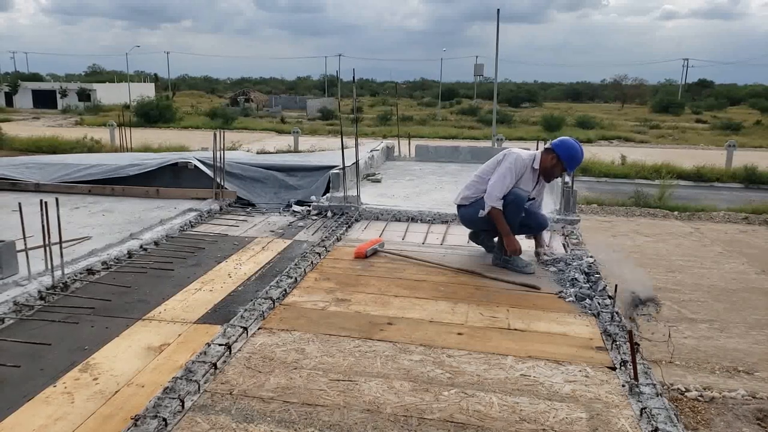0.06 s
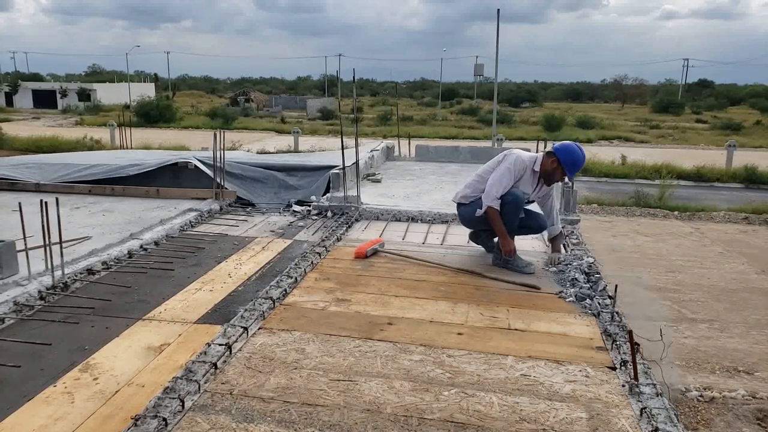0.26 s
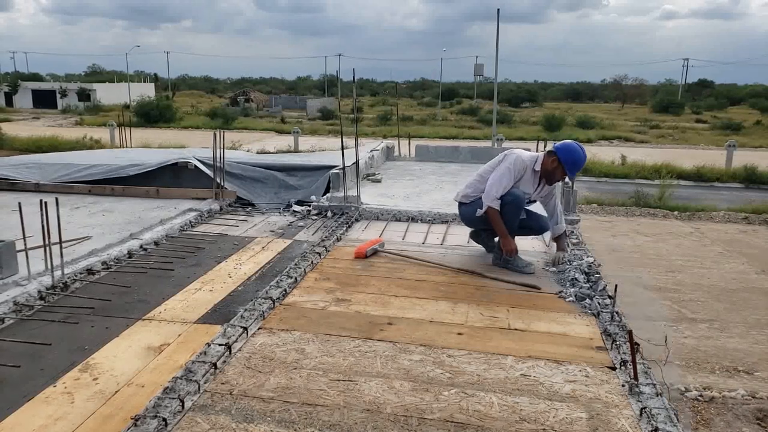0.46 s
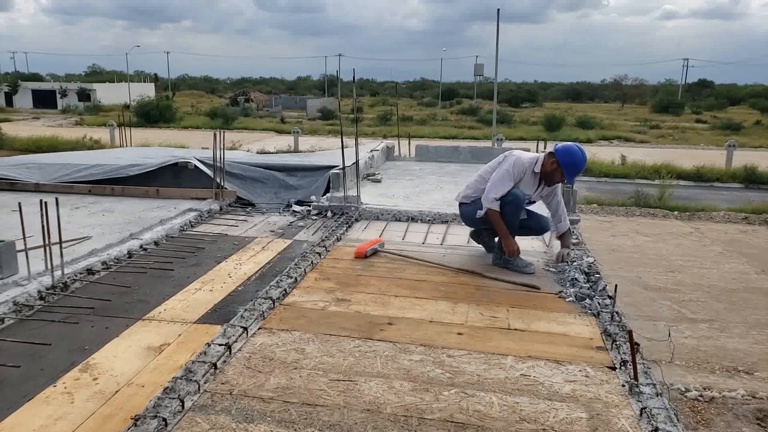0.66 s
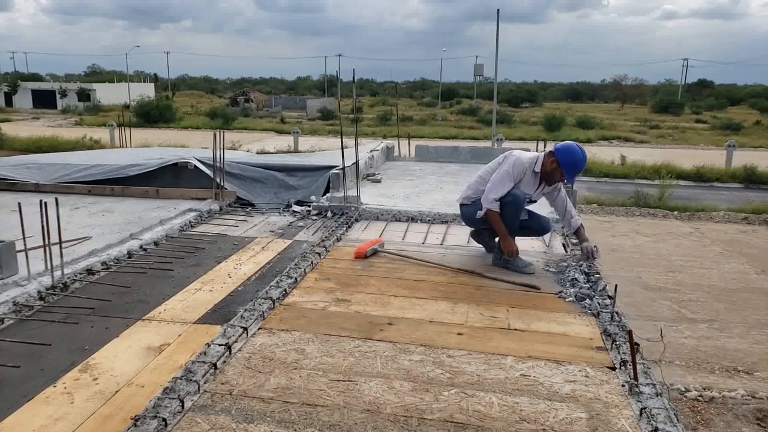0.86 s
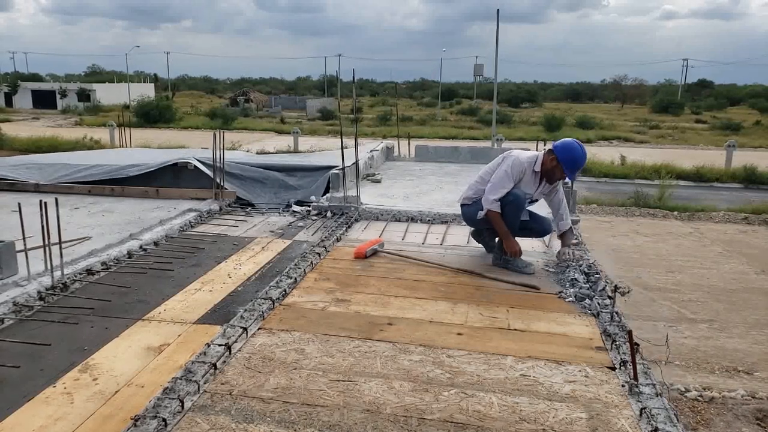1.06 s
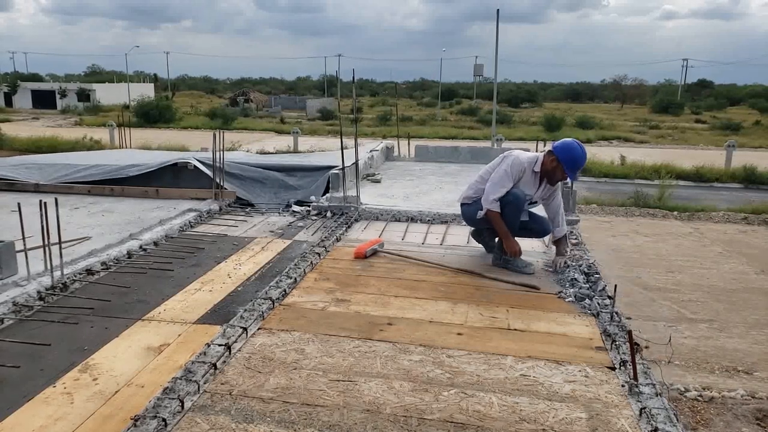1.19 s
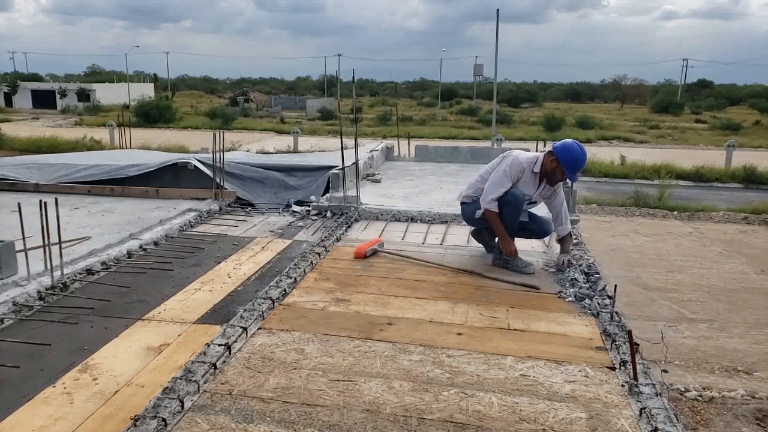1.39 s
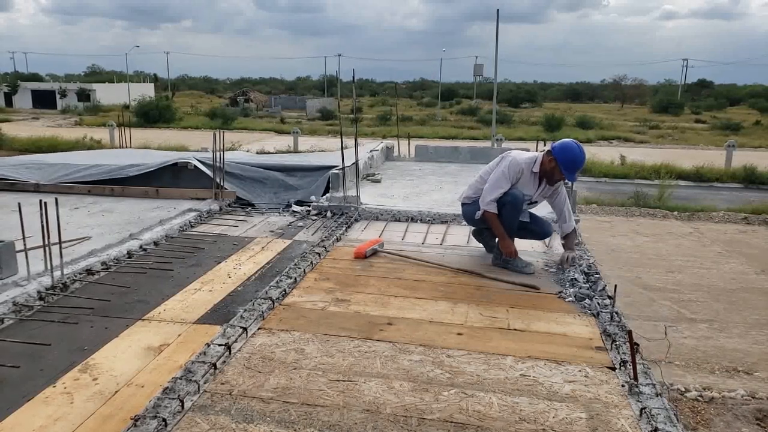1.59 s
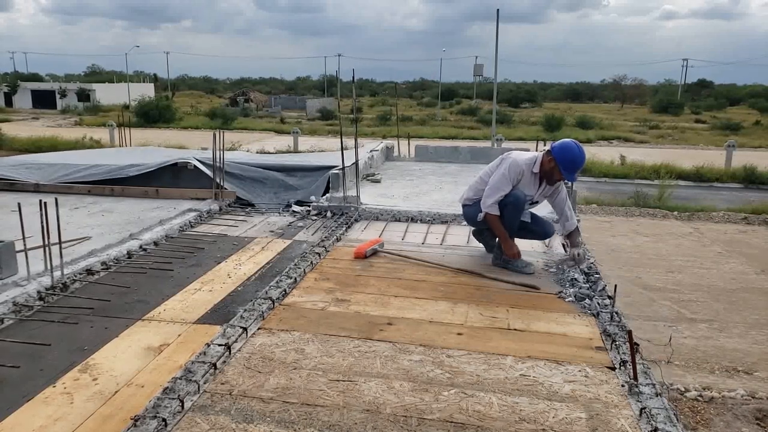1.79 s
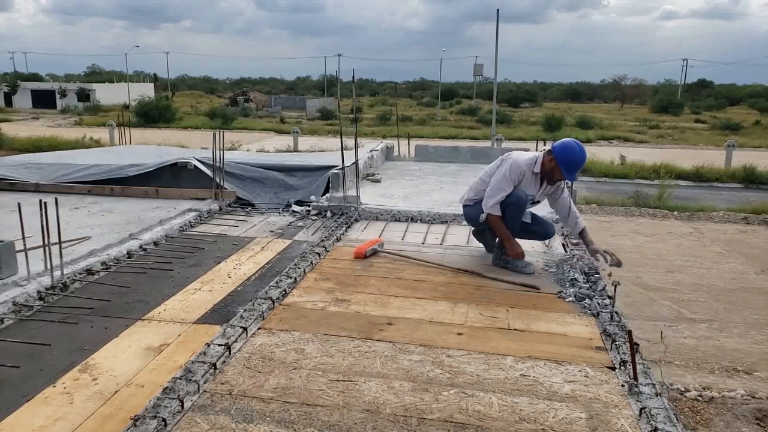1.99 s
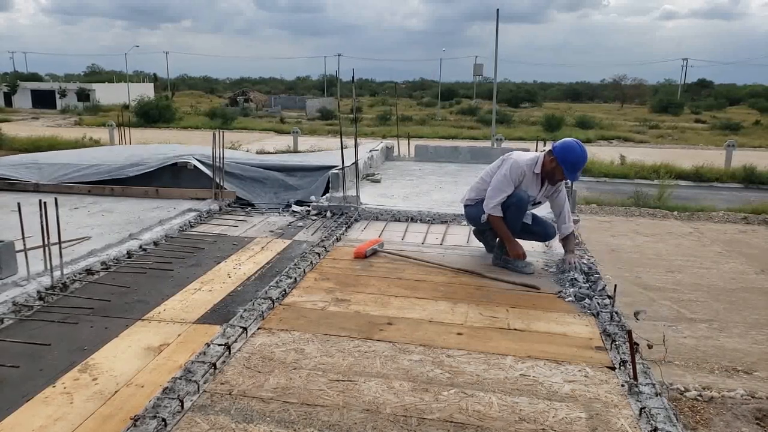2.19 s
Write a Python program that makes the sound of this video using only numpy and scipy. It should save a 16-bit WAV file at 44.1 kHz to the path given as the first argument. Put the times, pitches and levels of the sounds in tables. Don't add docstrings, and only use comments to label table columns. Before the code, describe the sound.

Broken concrete chunks and gravel scraped by hand in four crunching pulls, stones clacking, outdoors

```python
import sys
import numpy as np
from scipy import signal
from scipy.fft import rfft, irfft
from scipy.io import wavfile

SR = 44100
rng = np.random.default_rng(int(sys.argv[2]) if len(sys.argv) > 2 else 0)


def amplitude_ratio(level_db):
    exponent = np.asarray(level_db, float) / 20
    return 10 ** exponent


def to_wav(s):
    ch = np.atleast_2d(s).T
    pcm = np.round(np.clip(ch, -1, 1) * 32767)
    wavfile.write(sys.argv[1], SR, pcm.astype(np.int16))


N = 99225

# (pitch [Hz], width [Hz], level [dB])
CHUNK_RINGS = [(1331, 347, 2.5), (1665, 680, -8.5), (2140, 680, 0.5), (2350, 90, -10.5), (3232, 314, 2),
               (4050, 570, -3.5)]
# (pitch [Hz], width [Hz], level [dB])
GRIT_RINGS = [(5420, 1120, -1), (6500, 900, 5), (8600, 590, 0.5), (10700, 200, -9.5)]
SLIP_S = 0.00098
SNAP_RISE_S = 0.0006


def evened(x):
    return x / np.sqrt(np.mean(x ** 2) + 1e-20)


def add(mix, s, sound):
    part = mix[round(s * SR):][:len(sound)]
    part += sound[:len(part)]


def resonate(x, hz, width):
    b, a = signal.iirpeak(min(hz, .45 * SR), hz / max(width, 5), SR)
    return signal.lfilter(b, a, x)


def body(x, rings):
    total = 0
    for k, (hz, width, db) in enumerate(rings):
        ring = resonate(resonate(x, hz, width), hz, 2 * width)
        total = total + (-1) ** k * amplitude_ratio(db) * ring
    return total


def lumps(per_s, depth_db):
    count = int(N / SR * 400) + 9
    drift = signal.lfilter([1], [1, -np.exp(-per_s / 400 * 2 * np.pi)], rng.standard_normal(count))
    return amplitude_ratio(depth_db * np.interp(np.arange(N), np.linspace(0, N, count), evened(drift)))


def slips(per_s, spread_db, hiss, burst_s):
    happens = rng.random(N) < per_s / SR
    size = amplitude_ratio(spread_db * np.minimum(rng.exponential(1, N), 2.5)) * happens
    scratch = signal.lfilter([1], [1, -np.exp(-1 / (burst_s * SR))], size)
    return (evened(scratch) + hiss) * rng.standard_normal(N)


def layer(rings, shared, level_db, own, per_s, spread_db, hiss, burst_s, patchy_db, lean=0, pivot_hz=2000):
    plain, leaning = 0, 0
    for ring in rings:
        rub = shared + own * evened(slips(per_s, spread_db, hiss, burst_s))
        sound = body(rub, [ring]) * lumps(3.2, patchy_db)
        plain = plain + sound
        leaning = leaning + sound * amplitude_ratio(lean * np.log2(ring[0] / pivot_hz))
    return amplitude_ratio(level_db) * leaning / np.std(plain)


def over_time(table):
    times, *columns = np.transpose(table)
    return [np.interp(np.arange(N) / SR, times, column) for column in columns]


def grinding():
    # (time [s], level [dB], lean towards smaller stones [dB per octave])
    pulls = [(0, -70, -2), (.2, -71.5, 1), (.25, -22.5, -3.5), (.42, -28.5, -2.5), (.52, -36.5, -7.5),
             (.65, -48.5, 1.5), (.72, -32.5, -1.5), (.88, -26.5, -5.5), (.94, -47, 7), (1.04, -54.5, -4),
             (1.2, -61.5, -2), (1.27, -24.5, -7.5), (1.4, -42.5, -7.5), (1.55, -32.5, -5.5),
             (1.7, -37, -1.5), (1.82, -25, -5.5), (1.97, -36.5, 3.5), (2.03, -56.5, -1)]
    # (time [s], level [dB], lean towards the finest grit [dB per octave])
    grit_run = [(0, -56.5, 23), (.07, -58.5, 28), (0.197, -69.5, 44), (0.236, -28, 2), (.55, -44, -11),
                (0.658, -45, -17), (0.782, -23.5, 2), (0.971, -35.5, -3), (1.03, -47, 9), (1.181, -73, -1),
                (1.224, -34.5, 11), (1.328, -37, -4), (1.4, -48, -27), (1.58, -45, -37), (1.82, -29.5, -3),
                (1.968, -32.5, -5), (2.042, -52, 7), (2.25, -59, 7)]
    # (time [s], level [dB], share of board ring [dB])
    load = [(0, -62, 0), (.1, -85, 12), (0.196, -68.5, 5.5), (0.248, -17, 2.5), (.41, -17, -10.5),
            (.46, -26, -5), (.51, -18.5, -19), (.67, -29.5, -20), (0.768, -32.5, 8), (0.901, -43.5, 2),
            (1.19, -75.5, 10.5), (1.26, -37, 8), (1.42, -40.5, 1.5), (1.69, -44.5, 11.5), (1.75, -23, -6),
            (1.88, -38, 3.5), (2.089, -48.5, -7), (2.199, -36.5, -12.5)]
    # (time [s], level [dB])
    sifting = [(0, -57), (.05, -46), (.17, -65), (.22, -39), (.48, -42.5), (.66, -67.5), (.77, -31),
               (.98, -41), (1.18, -86), (1.21, -43), (1.25, -35), (1.54, -65), (1.565, -50), (1.72, -54.5),
               (1.84, -38), (1.95, -39), (2.18, -76), (2.25, -52)]
    # (pitch [Hz], width [Hz], level [dB])
    dust_rings = [(12900, 1200, -5), (14600, 1700, 0)]
    slab_rings = [(71.4, 42, 2), (151, 55.7, 2.5), (222.4, 59, -3)]
    board_rings = [(373.7, 109, 0), (395.7, 48, -11.5), (511, 143, -7.5), (663, 63, -12), (900, 46, -12)]

    drag, small_lean = over_time(pulls)
    grit, fine_lean = over_time(grit_run)
    weight, board_share = over_time(load)
    dust, = over_time(sifting)
    shared = evened(slips(per_s=450, spread_db=3.5, hiss=.8, burst_s=SLIP_S)) * lumps(25, 1.5)
    b, a = signal.butter(2, (600, 7000), "band", fs=SR)
    scrape = amplitude_ratio(drag - 24) * evened(signal.lfilter(b, a, shared))
    return (scrape
            + layer(CHUNK_RINGS, shared, drag, 1.6, 200, 3, .8, .0015, 2.2, small_lean)
            + layer(GRIT_RINGS, shared, grit, 1.5, 900, 3, .8, SLIP_S, 2, fine_lean, 6500)
            + layer(dust_rings, shared, dust + 1, 1.3, 900, 3, .8, SLIP_S, 1.8)
            + layer(slab_rings, shared, weight - 2.5, 3.5, 120, 16.0, 1.0, 0.0013, 1.6)
            + layer(board_rings, shared, weight + board_share - 1.5, 0.92, 120, 9.0, 1.0, 0.00046, 1.0))


def clacks():
    # (time [s], peak level [dB], pitch [Hz], grit share [dB])
    strikes = [(0.237, -1, 3720, -1.5), (0.2458, -1, 1335, 5), (0.7864, -8.5, 3540, -14),
               (0.8819, -12.5, 1400, -20), (0.9084, -7.5, 7040, 1), (0.9225, -5, 7300, 3),
               (0.9724, -25, 6080, -8), (0.9889, -4.5, 6330, 5.5), (1.0043, -9, 1713, -12),
               (1.12, -34, 1090, -14), (1.1483, -29, 1160, -39), (1.2797, -5.5, 1144, -5.5),
               (1.3487, -11, 1180, -32), (1.4286, -12, 2050, -5.5), (1.491, -11, 2100, -10),
               (1.5166, -4, 2170, -5), (1.5568, -3.5, 2040, -10.5), (1.7591, -6.5, 1640, -18),
               (1.8189, 2.5, 2350, 2), (1.884, -3.5, 1540, -25), (1.899, 5, 3376, -9),
               (1.9395, 1.5, 1680, 4), (1.9682, -0.5, 2290, -5), (2.073, -34.5, 1950, -20),
               (2.11, -29, 2120, -24)]
    crack_s, tail_s, tail_share, ring_s = 0.0011, .02, .25, 0.0077
    out, t = np.zeros(N), np.arange(2000) / SR
    fade = np.exp(-3 * t / crack_s) + tail_share * np.exp(-3 * t / tail_s)
    shape = (1 - np.exp(-t / SNAP_RISE_S)) * fade
    for s, db, hz, grit_db in strikes:
        crack = rng.standard_normal(len(t)) * shape
        hit = evened(body(crack, [(hz, 1.72 / ring_s, 0)]))
        hit = hit + amplitude_ratio(-2.5) * evened(body(crack, CHUNK_RINGS))
        hit = hit + amplitude_ratio(grit_db) * evened(body(crack, GRIT_RINGS))
        add(out, s, amplitude_ratio(db - 9.0) * hit / abs(hit).max())
    return out


def ticks():
    # (time [s], peak level [dB], pitch [Hz])
    snaps = [(0.1166, -29, 9000), (0.3574, -17, 1400), (0.4627, -17.5, 1590), (0.582, -15.5, 6100),
             (0.63, -24, 6400), (0.6564, -29, 6460), (0.6713, -17, 6000), (0.7069, -6, 6100),
             (0.7141, -8, 3400), (0.7651, -13, 2320), (0.8305, 0, 6450), (0.8442, -7.5, 1440),
             (0.8744, -3.5, 6100), (0.9514, -17, 6400), (0.9794, -8.5, 5800), (1.0104, -16, 1130),
             (1.062, -21.5, 8000), (1.124, -30, 1120), (1.1982, -25.5, 8360), (1.2391, -11, 5090),
             (1.263, -23, 1400), (1.407, -17.5, 1250), (1.5318, -22, 1970), (1.5973, -8, 2100),
             (1.6644, -12, 2320), (1.718, -13, 2230), (1.737, -15, 1530), (1.7814, -4, 2350),
             (1.7945, -6, 2200), (1.8114, -7.5, 2350), (1.846, -2, 8800), (1.8506, -9, 2370),
             (1.9074, -7, 8600), (1.9227, -8, 6600), (1.9338, 0.5, 1580), (1.9434, -9, 6560),
             (1.9615, 1, 5300), (1.9834, -34, 6700), (1.99, -16, 8900), (2.0059, -15.5, 6350),
             (2.0224, -30, 2350), (2.036, -23, 8620), (2.0955, -34, 2060), (2.1234, -50, 1200),
             (2.1758, -28.5, 6750), (2.2444, -21, 6500)]
    fade_s, sharpness = .002, 6
    out, t = np.zeros(N), np.arange(900) / SR
    shape = np.exp(-t / fade_s) * (1 - np.exp(-t / SNAP_RISE_S))
    for s, db, hz in snaps:
        snap = rng.standard_normal(len(t)) * shape
        own_ring = evened(body(snap, [(hz, hz / sharpness, 0)]))
        hit = own_ring + amplitude_ratio(-9) * evened(body(snap, CHUNK_RINGS + GRIT_RINGS))
        add(out, s, amplitude_ratio(db - 9.5) * hit / abs(hit).max())
    return out


def thuds():
    # (time [s], peak level [dB], pitch [Hz], rise [s])
    drops = [(.2581, -12.5, 400, 0.0015), (0.3598, -10.5, 150, 0.0025), (0.3969, -9, 147, 0.0027),
             (0.5169, -11, 159, 0.002), (0.5455, -9, 168, 0.001), (0.5679, -16, 142, .0031),
             (0.6341, -22.1, 110, 0.0048), (.6721, -21.5, 110, .0041), (1.7315, -28.5, 125, 0.0061),
             (1.7653, -29, 113, .0052), (0.5917, -16, 104, 0.003), (0.6864, -18, 113, 0.00384),
             (1.6554, -25.5, 352, 0.0026), (1.747, -31, 121, 0.0081), (2.1144, -25.5, 336, 0.0032),
             (2.185, -35, 312, 0.0069)]
    out, t = np.zeros(N), np.arange(3000) / SR
    for s, db, hz, rise in drops:
        u = t / (1.76 * rise)
        push = (u * np.exp(1 - u)) ** 2
        swing = np.cos(2 * np.pi * hz * (t - 2.3 * rise))
        add(out, s - 1.9 * rise, amplitude_ratio(db) * push * swing)
    return out


def chips():
    # (time [s], peak level [dB], pitch [Hz], time to fade by 60 dB [s])
    pure_notes = [(.0561, -43, 6600, .08), (.2092, -28, 8590, .06), (.2575, -15, 1340, .05),
                  (.2612, -14, 3230, .04), (1.0042, -22, 426, .03), (1.0043, -15, 1100, .03),
                  (1.0045, -10, 2127, .016), (1.0046, -15, 1400, .022), (1.0085, -17, 1390, .02),
                  (1.9003, -5, 4300, .01), (1.9425, -8, 6500, .008), (2.0616, -16.5, 8635, .035),
                  (2.1881, -38, 6650, .03)]
    rise_s = 0.00041
    out, t = np.zeros(N), np.arange(5000) / SR
    for s, db, hz, fade_s in pure_notes:
        loudness = amplitude_ratio(db - 60 * t / fade_s) * (1 - np.exp(-t / rise_s)) ** 2
        add(out, s, loudness * np.sin(2 * np.pi * hz * t))
    return out


def air():
    # (pitch [Hz], level [dB per Hz])
    hush = [(24, -50), (40, 0), (790, 30), (1950, -56), (7730, -84), (8550, 67), (11800, -61), (14100, -32),
            (16000, 18)]
    hz, (points, db) = np.fft.rfftfreq(N, 1 / SR), np.transpose(hush)
    gain = amplitude_ratio(np.interp(np.log(hz + 1), np.log(points), db))
    return amplitude_ratio(-71) * evened(irfft(rfft(rng.standard_normal(N)) * gain, N))


def hum():
    t, hz = np.arange(N) / SR, 400
    return amplitude_ratio(-74) * (np.sin(2 * np.pi * hz * t) + np.sin(2 * 2 * np.pi * hz * t))


def scene():
    mono = grinding() + clacks() + ticks() + thuds() + chips() + air() + hum()
    return np.array([mono, mono])


def turn_over(x):
    # (middle time [s], length [s], middle pitch [Hz], width [Hz])
    turns = [(0.05, 0.028, 8950, 900), (0.053, 0.031, 12800, 700), (0.02, 0.056, 11600, 600),
             (0.146, 0.13, 11800, 900), (0.25, 0.034, 8600, 250), (0.23, .06, 14300, 500),
             (0.262, 0.04, 11600, 1500), (0.542, 0.11, 11700, 800), (0.65, 0.093, 10700, 1200),
             (0.685, 0.076, 12000, 1200), (1.074, 0.036, 12700, 900), (1.112, 0.056, 14100, 600),
             (1.311, 0.025, 7600, 900), (1.312, .03, 13600, 900), (1.375, 0.034, 12800, 600),
             (1.397, 0.074, 10700, 1300), (1.492, 0.068, 11700, 1000), (1.71, .05, 11700, 500),
             (2.015, 0.035, 9300, 600), (2.02, .04, 14700, 600), (2.106, 0.075, 12900, 1500),
             (2.19, 0.038, 12900, 3000), (2.24, .03, 14200, 900)]
    hz, t, z = signal.stft(x, SR, nperseg=1024, noverlap=768)
    turned = np.zeros(z.shape, bool)
    for s, length, middle, width in turns:
        turned |= (abs(t - s) < length / 2) & (abs(hz[:, None] - middle) < width / 2)
    return signal.istft(z * (1 - 2 * turned), SR, nperseg=1024, noverlap=768)[1][:N]


def low_pass(x):
    return signal.sosfilt(signal.butter(12, 16550, fs=SR, output="sos"), x)


def record(dry):
    low_cut = signal.butter(2, 45, "high", fs=SR, output="sos")
    high_cut = signal.firwin(511, 16050, window=("kaiser", 9), fs=SR)
    x = signal.oaconvolve(signal.sosfilt(low_cut, dry), high_cut[None], "same")
    return low_pass(np.array([x[0], turn_over(x[1])]))


dry = scene()
out = record(dry)
to_wav(out)
```